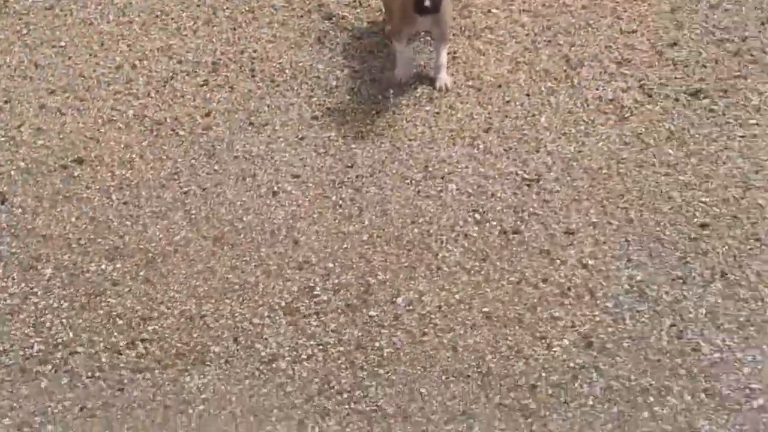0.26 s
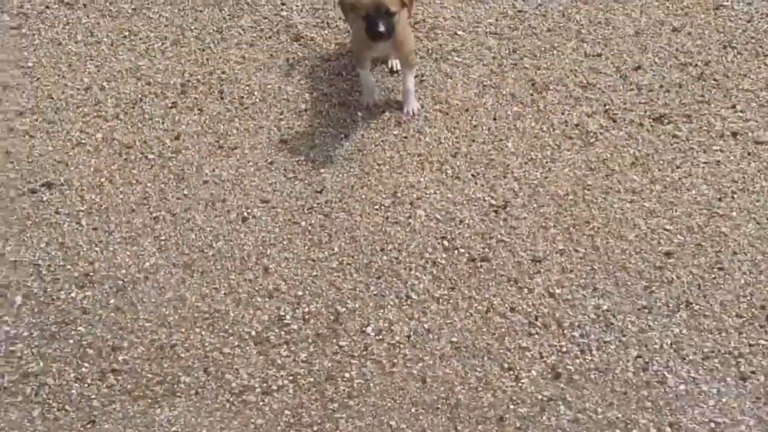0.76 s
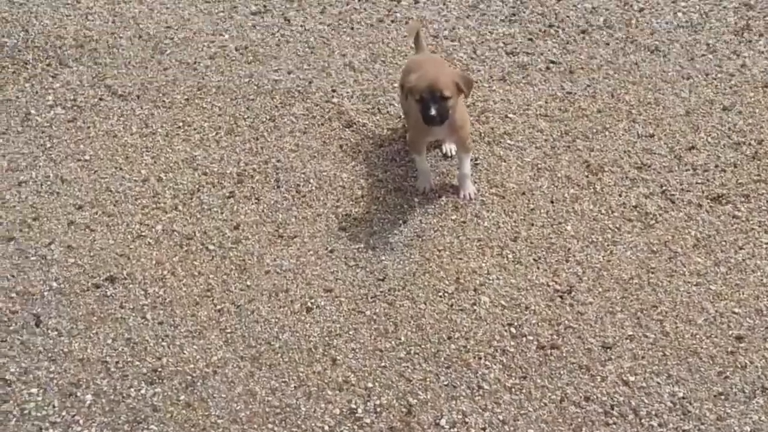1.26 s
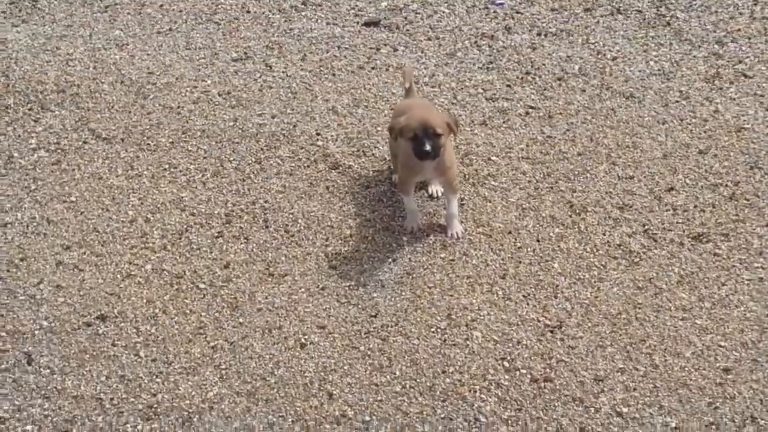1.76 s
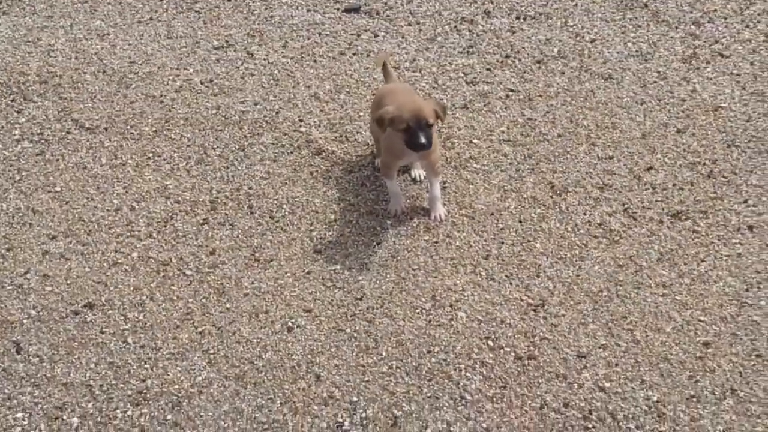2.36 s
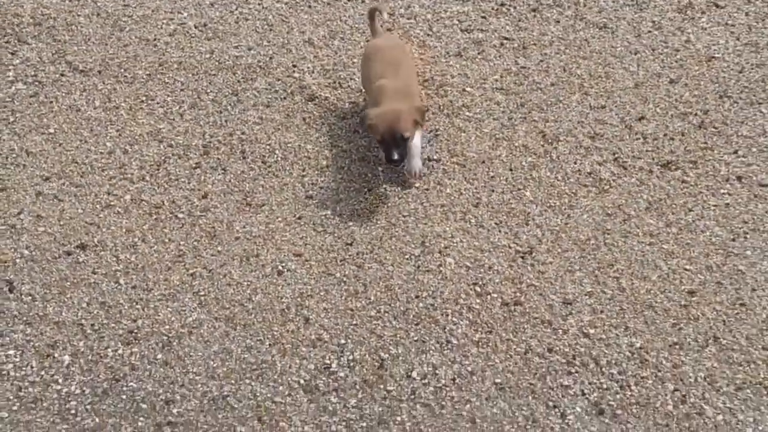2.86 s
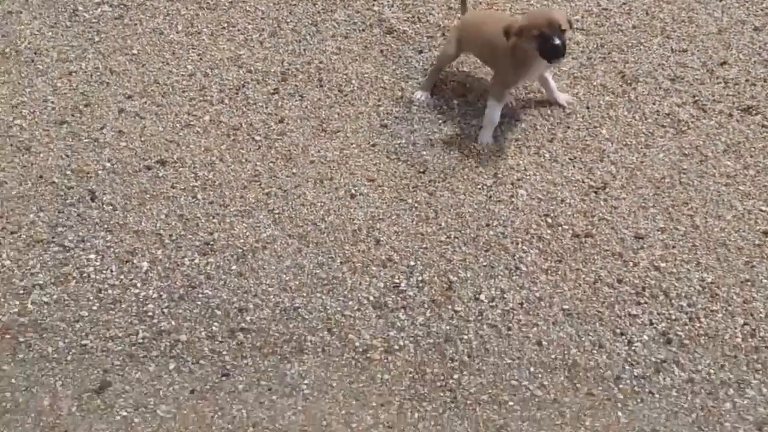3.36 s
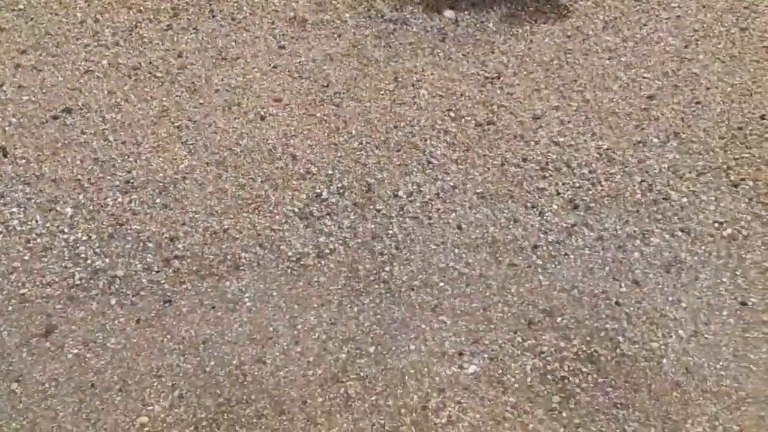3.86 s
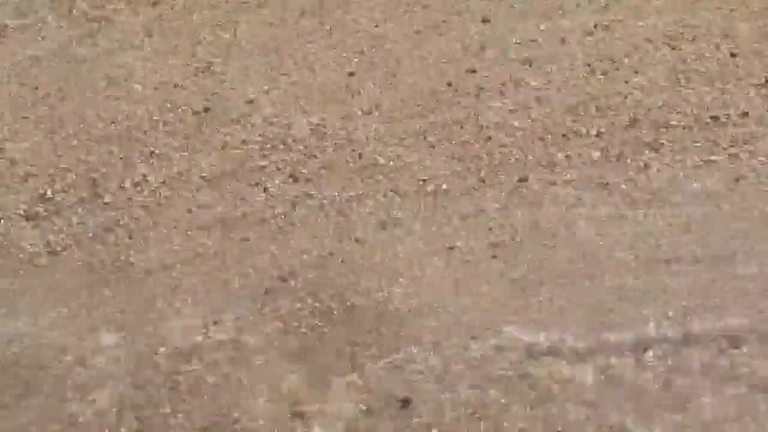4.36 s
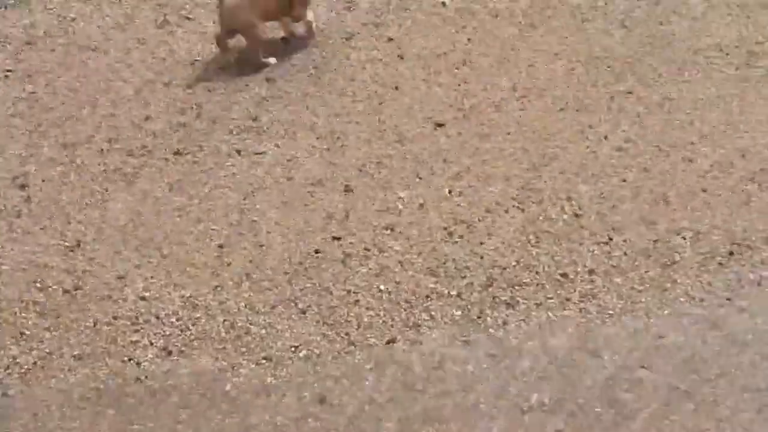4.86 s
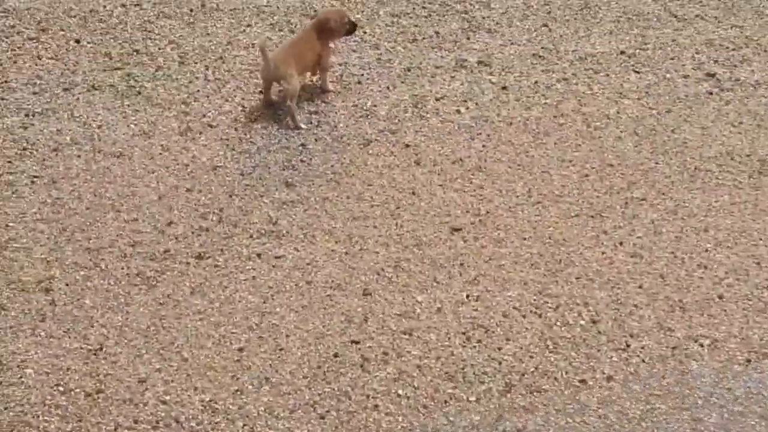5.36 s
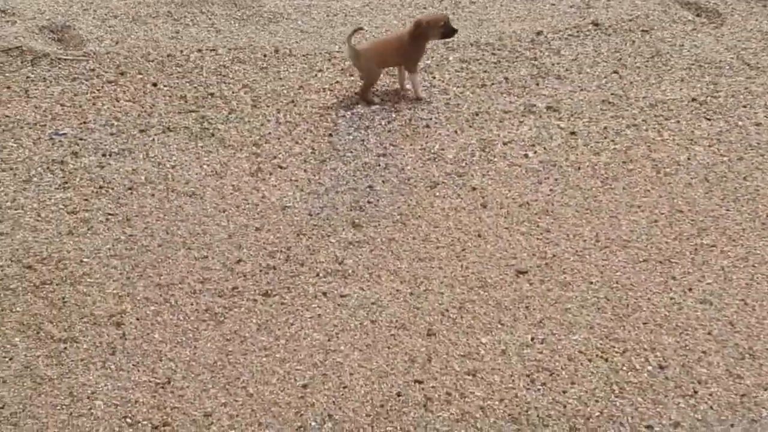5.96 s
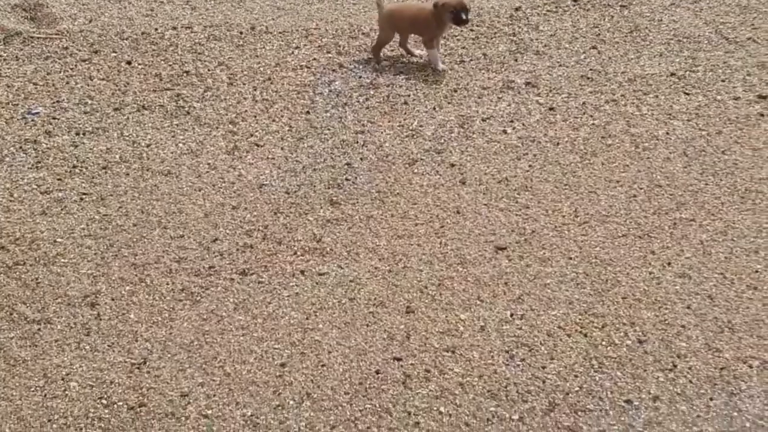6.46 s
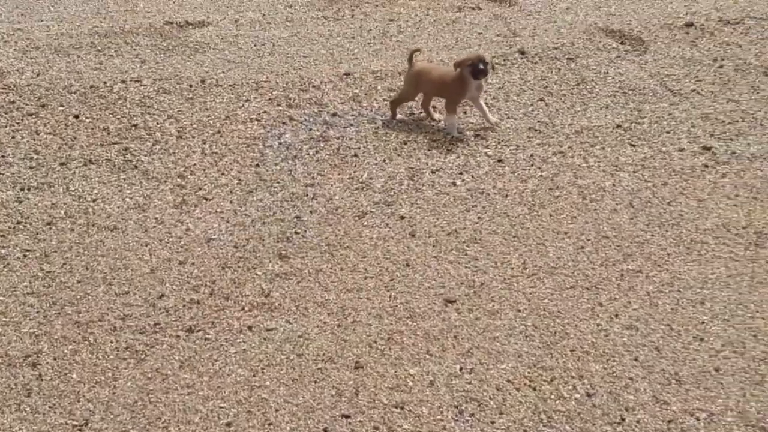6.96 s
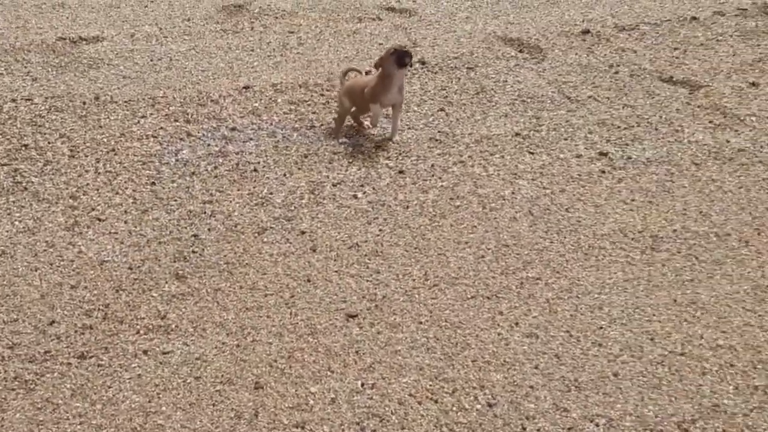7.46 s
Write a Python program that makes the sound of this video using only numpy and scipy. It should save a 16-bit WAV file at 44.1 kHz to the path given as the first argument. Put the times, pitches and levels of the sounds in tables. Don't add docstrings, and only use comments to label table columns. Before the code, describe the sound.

A small puppy yips, yelps and whines in sharp high bursts on a pebble beach, over low rumbling surf, fizzing foam and clicking stones.

```python
import sys
import numpy as np
from scipy import signal
from scipy.fft import rfft, irfft, next_fast_len
from scipy.io import wavfile
from scipy.ndimage import uniform_filter1d, minimum_filter1d

SR = 44100
rng = np.random.default_rng(int(sys.argv[2]) if len(sys.argv) > 2 else 0)


def store_pcm(level_fs):
    pcm = np.round(np.clip(level_fs, -1, 1) * 32767).astype(np.int16)
    wavfile.write(sys.argv[1], SR, np.atleast_2d(pcm).T)


def level_to_linear(level):
    exponent = np.asarray(level, float) / 20
    return 10 ** exponent


N = 340893


# (start [s], end [s], chaos share [0-1], cycles per repeating pattern, fractional lines [dB])
BREAKS = [ (-.01, .048, .99, 1, 0), (2.6, 2.66, .015, 1, 0), (2.82, 2.885, .2, 5, -9),
          (3.135, 3.227, .95, 1, 0), (3.23, 3.258, .2, 2, -13), (3.382, 3.478, .88, 1, 0),
          (3.73, 3.79, .9, 1, 0), (3.79, 3.824, .08, 2, -11), (4.212, 4.287, .92, 1, 0),
          (4.32, 4.35, .15, 1, 0), (4.678, 4.724, .88, 1, 0), (4.724, 4.762, .06, 2, -11),
          (5.062, 5.1, .85, 1, 0), (5.1, 5.14, .05, 2, -6), (5.46, 5.485, .3, 1, 0),
          (5.81, 5.83, .15, 1, 0), (6.195, 6.237, .9, 1, 0), (6.235, 6.265, .05, 2, -9),
          (6.603, 6.699, .93, 1, 0), (7.064, 7.187, .7, 3, -2), (7.343, 7.41, .04, 2, 3),
          (7.595, 7.625, .3, 2, -4), (7.625, 7.678, .92, 1, 0)]
CHAOS_LOW_DB = [13.5, 0, -12, 8, -1, 6, -6, -1, 3, -3, -7, 0, 0, 4, 10, 0, 5, 7, -4, -0.5, 2, 2, 5]
LOW_LINE_DB_PER_HZ = -0.04


def puppy():
    t = np.arange(N) / SR
    hz, levels_db = calls()
    mouth = mouth_motion(t, levels_db[1])
    jitter = 0.00528 * evened(uniform_filter1d(rng.standard_normal(N), 200))
    turns = np.cumsum(hz * (1 + jitter)) / SR
    bands = partials(turns, hz, mouth, order=1, fraction_db=0)
    for (start, end, share, cycles, fraction_db), low_db in zip(BREAKS, CHAOS_LOW_DB):
        part = slice(max(round((start - .01) * SR), 0), round((end + .01) * SR))
        fade = np.clip(np.minimum((t[part] - start) / .012, (end - t[part]) / .01) + .5, 0, 1)
        lines = partials(turns[part], hz[part], mouth[:, part], cycles, fraction_db)
        rough = np.array(chaos(hz[part], mouth[:, part].mean(1), low_db))
        line_loss_db = share * LOW_LINE_DB_PER_HZ * np.maximum(1350 - hz[part], 0)
        kept = (1 - share) * level_to_linear(np.outer([2, 0], line_loss_db))
        broken = (np.sqrt(kept) * lines + np.sqrt(share) * rough) / np.sqrt(kept + share)
        bands[:, part] = np.sqrt(1 - fade) * bands[:, part] + np.sqrt(fade) * broken
    voice = (bands * uniform_filter1d(level_to_linear(levels_db), size=150)).sum(0)
    return at_ports(t, voice) + teeth(levels_db[1] + mouth[4])


# (time [s], pitch [Hz], effort [dB], first partial over the rest [dB])
YIPS = [
    [(0.555, 1067, -62, 21), (0.572, 1217, -53, 1), (0.584, 1257, -64, 17), (0.596, 1330, -33.5, 12),
     (0.606, 1388, -33.5, 15.5), (0.622, 1404, -29, 10), (0.65, 1297, -53, 28), (0.7, 1158, -55, 6)],
    [(1.15, 944, -71, -4), (1.174, 1184, -27, 5.5), (1.192, 1200, -16, -6.5), (1.214, 1326, -18, -4),
     (1.234, 1378, -35.5, 14.5), (1.252, 1283, -43.5, 8), (1.268, 1150, -46, -6), (1.285, 1020, -51, 12)],
    [(1.77, 943, -69, -2), (1.776, 922, -66, 24), (1.814, 1233, -36.5, -1), (1.83, 1360, -30, 21.5),
     (1.846, 1425, -28.5, 17), (1.862, 1482, -20.5, 8), (1.884, 1326, -44, 25), (1.93, 1152, -48.5, 8)],
    [(3.7, 933, -65, 5), (3.712, 902, -41, -0.5), (3.728, 984, -25, -10.5), (3.74, 1300, -21, -2),
     (3.756, 1409, -22, 5.5), (3.8, 1315, -20.5, 3), (3.856, 1309, -28, 0.5), (3.9, 1200, -39, -1.5)],
    [(4.18, 813, -70, -24), (4.202, 1046, -33.5, -4.5), (4.228, 1216, -22.5, -4), (4.252, 1230, -22, -9),
     (4.274, 1415, -23.5, -11), (4.308, 1470, -37, -1.5), (4.346, 1246, -38, 6), (4.38, 1142, -56, -13)],
]
# (time [s], pitch [Hz], effort [dB], first partial over the rest [dB])
LATE_YIPS = [
    [(5.02, 946, -74, 0), (5.032, 933, -45.5, 4), (5.06, 1145, -29.5, -1.5), (5.104, 1227, -30.5, 0),
     (5.114, 1335, -30, 3.5), (5.156, 1305, -43, 10), (5.186, 1160, -38.5, -1), (5.24, 996.5, -67, 21)],
    [(5.385, 937, -70, 10), (5.403, 897.7, -45.5, 7), (5.439, 1227, -29.5, 5), (5.475, 1267, -24, -2),
     (5.497, 1355, -23.5, 10), (5.527, 1253, -31, -1), (5.571, 1065, -62, 10), (5.6, 979, -70, 9)],
    [(5.765, 1008, -56.5, 5), (5.783, 953.6, -40, 12), (5.797, 1054, -29, -3), (5.813, 1161, -26, -7.5),
     (5.839, 1303, -23, 2.5), (5.855, 1312, -31.5, 16), (5.9, 1215, -45.5, -13)],
    [(6.155, 852.4, -76, 1), (6.171, 821, -39.5, 9.5), (6.215, 1098, -22.5, -4.5), (6.223, 1267, -20, -2.5),
     (6.243, 1225, -21.5, -2.5), (6.267, 1342, -23, 0.5), (6.285, 1321, -19, 2), (6.316, 1217, -30, 1.5),
     (6.347, 1160, -56, -1)],
    [(6.57, 865, -58, 17), (6.578, 852.4, -44, 4.5), (6.618, 1090, -20.5, 0), (6.634, 1320, -16.5, -1),
     (6.672, 1295, -20.5, 7.5), (6.678, 1246, -18, -8), (6.7, 1312, -22.5, 1), (6.724, 1316, -22.5, 1.5),
     (6.79, 1138, -53.5, -1)],
]
# (time [s], pitch [Hz], effort [dB], first partial over the rest [dB])
YELPS = [
    [(0.0, 1650, -9, 5), (0.028, 1618, -20.5, 4), (0.036, 1487, -21, 8), (0.056, 1341, -11.5, 13),
     (0.076, 1443, -25.5, 20), (0.086, 1294, -24.5, 8), (0.108, 1296, -58, 22), (0.14, 1058, -43, -7)],
    [(2.76, 1364, -45, 3), (2.784, 1354, -27.5, 7), (2.816, 1480, -12, 7.5), (2.822, 1434, -17.5, 0),
     (2.881, 1528, -17, 0), (2.89, 1586, -12, 3), (2.936, 1557, -23.5, 10), (2.962, 1417, -36, 2),
     (2.975, 1552, -66.5, -6)],
    [(3.13, 1409, -42.5, 0), (3.14, 1408, -37, -9), (3.152, 1636, -17, -1.5), (3.176, 1614, -23, 4.5),
     (3.186, 1509, -18.5, -3), (3.2, 1465, -14.5, 15), (3.244, 1316, -22, 4), (3.294, 1327, -23, 1),
     (3.34, 1176, -43.5, 8)],
    [(3.34, 1176, -42, -8), (3.366, 1258, -27.5, -6), (3.378, 1253, -23.5, 5), (3.392, 1425, -21, -3.5),
     (3.402, 1406, -20, 10), (3.44, 1482, -19, 9.5), (3.45, 1330, -21.5, 5.5), (3.502, 1431, -19.5, 11),
     (3.555, 1275, -47.5, 4)],
]
# (time [s], pitch [Hz], effort [dB], first partial over the rest [dB])
MORE_YELPS = [
    [(2.56, 984, -80, 27), (2.594, 1208, -32.5, 0), (2.612, 1382, -16, 16), (2.616, 1249, -9.5, -5.5),
     (2.64, 1427, -17, 0.5), (2.657, 1584, -26.5, 17), (2.665, 1493, -47, 22.5), (2.71, 1430, -44, 23),
     (2.76, 1312, -50, 16)],
    [(4.645, 955, -49, -3), (4.673, 1094, -28.5, -5.5), (4.701, 1298, -21.5, -4.5), (4.727, 1371, -22, 1),
     (4.751, 1365, -24.5, -3), (4.771, 1362, -28.5, -4), (4.82, 1230, -46.5, 1), (4.87, 1063, -61, 9)],
    [(7.05, 800, -54, 9), (7.067, 934.6, -33, 3.5), (7.08, 1089, -19, -2), (7.145, 1173, -17.5, 4.5),
     (7.175, 1172, -23.5, -1.5), (7.197, 1144, -30, -1.5), (7.239, 1115, -51, 2), (7.28, 1024, -58, -1)],
    [(7.57, 896, -54, 8), (7.597, 1100, -31, 0), (7.622, 1196, -28, 1), (7.646, 1370, -23.5, 8),
     (7.658, 1301, -18, 5), (7.678, 1135, -21, -9), (7.7, 1179, -27.5, -5.5), (7.73, 1140, -36.5, 1)],
]
# (start [s], length [s], first pitch [Hz], last pitch [Hz], level [dB])
WHINES = [(0.145, 0.16, 984, 1085, -51), (0.7, 0.25, 1156, 1087, -47.5), (1.289, 0.29, 984, 1057, -44.5),
          (1.915, 0.11, 1212, 939.7, -41.5), (2.242, 0.027, 928, 964, -42),
          (3.898, 0.12, 1233, 1171, -54.5), (4.38, 0.12, 1163, 1123, -55), (5.9, 0.097, 1221, 917, -46),
          (6.345, 0.085, 1157, 990, -51), (6.783, 0.13, 1130, 1007, -54), (7.283, .13, 960, 920.6, -43.5)]
WHINE_UPPER_DB = [-4, -9.5, -6, -9, -7.5, 1, 3, -5.5, -2, 10.5, 0]
# (bow of the pitch [Hz], accent on the ending [dB])
WHINE_SHAPE = [(-3, -5), (-21.5, -3), (-35.5, 5), (5.5, -1), (3, 5), (-13.5, 9), (-24.5, 6), (12.5, -15),
               (5.5, -1), (-22, -15), (4.5, -3)]


def calls():
    track = np.array([[900], [-120], [-120]]) * np.ones(N)
    every = [whine(*row, db, *shape) for row, db, shape in zip(WHINES, WHINE_UPPER_DB, WHINE_SHAPE)]
    every += [yelp(rows) for rows in YIPS + LATE_YIPS + YELPS + MORE_YELPS]
    for t, *call in every:
        part = track[:, round(t[0] * SR):][:, :len(t)]
        call = np.array(call)[:, :part.shape[1]]
        part[:] = np.where(call[1] > part[1], call, part)
    unpitched = track[1] < -100
    for start, end, share, *_ in BREAKS[1:]:
        unpitched[round(start * SR):round(end * SR)] |= share >= .8
    track[0] = np.interp(np.arange(N), np.flatnonzero(~unpitched), track[0, ~unpitched])
    return uniform_filter1d(track[0], size=110), track[1:]


def yelp(rows):
    s, *curves = np.transpose(rows)
    t = np.arange(max(s[0], 0), s[-1], 1 / SR)
    hz, effort_db, purity_db = (np.interp(t, s, curve) for curve in curves)
    return t, hz, effort_db + purity_db, effort_db


WHINE_SWELL_DB, WHINE_EDGE_S, WHINE_DROP = 4.5, 0.047, 0.17


def whine(start, length, first_hz, last_hz, level_db, upper_db, bow_hz, accent_db):
    t = np.arange(0, length, 1 / SR)
    ending = np.clip(1 - (length - t) / min(WHINE_EDGE_S, length / 4), 0, 1)
    hz = first_hz + (last_hz - first_hz) * t / length + bow_hz * np.sin(np.pi * t / length)
    hz = hz * (1 - WHINE_DROP * ending ** 2)
    db = level_db + WHINE_SWELL_DB * (2 * t / length - 1) - 12 * ending ** 4
    return start + t, hz, db, db + upper_db + accent_db * (t / length) ** 4 + 4 * ending


# (time [s], stretch of the resonances [ratio], second resonance [dB], top [dB])
MOUTH = [(0, 0.984, 4, 12.5), (.22, 0.75, -2, -21), (0.601, 0.68, -32, 1), (0.799, 1.6, -13, -1),
         (1.202, 0.906, 1, 0), (1.33, 0.48, -6, -4), (1.6, 0.19, 6.5, -0.5), (1.85, 1.3, -13, -1),
         (2.263, 0.36, 7, 8), (2.629, 1.092, -8.5, -6), (2.881, 1.138, -1.5, -0.5), (3.201, 0.917, -3, 2.5),
         (3.449, 1.023, -6.5, -3.5), (3.781, 1.096, -5, 1), (3.949, 0.68, -11, -3), (4.02, 0.32, 14.5, 0),
         (4.251, 0.973, 2.5, 2.5), (4.721, 0.94, -2, 3), (5.1, 0.927, 1, 7.5), (5.48, 0.976, -6.5, 3),
         (5.839, 0.956, 3.5, 1), (5.95, .95, -10, 2), (6.249, 0.975, -1.5, 4.5), (6.385, .95, -9, 2),
         (6.659, 1.016, 1, 6), (6.86, 0.56, -7, 0), (7.121, 1.017, 6.5, 4), (7.37, 0.67, 19, 10),
         (7.65, 0.958, 4, 5.5)]
FOURTH_DB = [7, -9, 6, -3, 6.5, -13, 3, 4.5, 3.5, 3.5, 4, 1.5, -3, -4.5, -10, 8, 3.5, 3.5, -3.5, -6, 0.5,
             12, 0, 10.5, -0.5, 7.5, -8.5, 14, -7]
AIR_DB = [6.5, -2.5, 3, 0, 3.5, 4, -5, 16, -4, 7.5, 6.5, 0.5, 1.5, -1.5, -0.5, -7, 6, 2, -8.5, -11, -4, -2,
          -1, 0.5, 4.5, 0, 5.5, -4, 5.5]
ONSET_DULL_DB = -3.5


def mouth_motion(t, effort_db):
    at, *jaw = np.transpose(MOUTH)
    shut = np.clip((-36 - uniform_filter1d(effort_db, size=400)) / 9, 0, 1)
    mouth = np.array([*(np.interp(t, at, column) for column in [*jaw, FOURTH_DB, AIR_DB]), shut])
    rise_db_per_s = np.gradient(uniform_filter1d(effort_db, size=600)) * SR
    mouth[2:4] += ONSET_DULL_DB * np.clip(rise_db_per_s / 500, 0, 1)
    return mouth


def partials(turns, hz, mouth, order, fraction_db):
    sound, power = np.zeros((2, 2, len(hz))) + 1e-12
    for m in range(order, 12 * order):
        k = m / order
        gain = level_to_linear(tract_db(k * hz, mouth) + (fraction_db if m % order else 0))
        gain *= 1 + .35 * np.sin(turns / 16 + 3 * k * k)
        band = int(k > 1.15)
        sound[band] += gain * np.cos(2 * np.pi * k * turns + k * k)
        power[band] += gain ** 2 / 2
    return sound / np.sqrt(power)


def chaos(hz, mouth, low_db):
    drift, bursts, strength = rng.standard_normal((len(hz), 3)).T
    wander, bursts = (evened(uniform_filter1d(v, size=110)) for v in (drift, bursts))
    rate_hz = np.clip(hz, 1300, 1430) * np.clip(1 + .08 * wander, .2, 2)
    cycle = np.floor(np.cumsum(rate_hz) / SR)
    slaps = np.diff(cycle, prepend=0) * (.7 + .1 * bursts + .4 * strength)
    pockets_db = 5 * rng.standard_normal(40)

    def ring(f):
        peaks_db = np.interp(f, np.linspace(0, 16000, 40), pockets_db)
        delays = np.exp(1j * (f / 600) ** 2)
        return level_to_linear(tract_db(f, mouth) + peaks_db) * delays

    def low(f):
        return level_to_linear(low_db * np.clip((1450 - f) / 200, 0, 1)) / (1 + (880 / (f + 1)) ** 10)

    rung = [colour(slaps, lambda f: ring(f) * low(f) * ((f > 1740) == upper)) for upper in (0, 1)]
    return [v / np.sqrt(uniform_filter1d(v ** 2, size=n, mode="wrap")) for v, n in zip(rung, (900, 300))]


# (frequency [Hz], level [dB])
THROAT = [(600, -28.5), (1050, -27), (1400, -6.5), (1850, -4.5), (2300, -9.5), (2850, -28), (3400, -12.5),
          (4000, -9), (4550, -18.5), (5050, -13.5), (5750, -29), (6450, -17), (7900, -42.5), (10000, -67.5),
          (13500, -56)]
# (frequency [Hz], level [dB])
NOSE = [(1500, -11), (2050, -2.5), (2400, -24.5), (2900, -28.5), (3600, -21), (4200, -33.5), (4900, -22),
        (6000, -31), (8000, -42), (15000, -71)]
POCKET_HZ, POCKET_WIDTH_HZ, POCKET_DB = 2790, 187, -10
SHUT_TILT_DB = 5


def tract_db(hz, mouth):
    stretch, second_db, top_db, fourth_db, air_db, shut = mouth
    reach = above(hz, 1800) * np.clip((7900 - hz) / 2000, 0, 1)
    shape = (1 - shut) * read(THROAT, hz / stretch ** reach) + shut * read(NOSE, hz)
    shape = shape + POCKET_DB * np.exp(-((hz - POCKET_HZ) / POCKET_WIDTH_HZ) ** 2)
    shape = shape + SHUT_TILT_DB * shut * np.log2(np.maximum(hz / 3000, 1))
    second, fourth, top, air = (above(hz, edge) for edge in (2900, 4400, 5700, 9000))
    shape = shape + second_db * (1 - second) + fourth_db * (fourth - top)
    return shape + top_db * (top - air) + air_db * air


AIR_HISS_DB, AIR_HISS_HZ, AIR_HISS_WIDTH_HZ = -39.5, 13400, 1400


def teeth(level_db):
    noise = rng.standard_normal((2, N))
    hiss = evened(colour(noise, lambda f: np.exp(-((f - AIR_HISS_HZ) / AIR_HISS_WIDTH_HZ) ** 4)))
    sputter = evened(uniform_filter1d(rng.standard_normal(N), size=600))
    balance = level_to_linear(np.array([[3], [-3]]))
    return hiss * level_to_linear(4 * sputter) * balance * uniform_filter1d(level_to_linear(level_db + AIR_HISS_DB), size=300)


# (frequency [Hz], left minus right [dB])
DOG_SIDE = [(800, -2.2), (2800, -3), (4500, -5), (7400, -5), (9000, 4), (13500, 7)]
# (frequency [Hz], lead of the left port [rad])
DOG_PHASE = [(500, .4), (2400, .45), (3360, -1.5), (4220, -1.2), (4740, .8), (7580, 1.6)]
GROUND_DB, GROUND_T60_S = -17, .05


def at_ports(t, voice):
    tail = rng.standard_normal((2, 4000)) * level_to_linear(-60 * t[:4000] / GROUND_T60_S)
    scatter = signal.oaconvolve(voice[None], tail / np.linalg.norm(tail[0]), axes=1)[:, :N]

    def port(side):
        return lambda f: level_to_linear(side * read(DOG_SIDE, f) / 2) * np.exp(.5j * side * read(DOG_PHASE, f))

    return np.array([colour(voice + level_to_linear(GROUND_DB) * echo, port(side)) for side, echo in zip((1, -1), scatter)])


# (time [s], peak [dB], ring [Hz])
PEBBLES = [(0.3897, -53, 3780), (0.998, -40, 5625), (3.56, -41, 3476), (3.597, -60, 3560),
           (3.6492, -44, 5830), (4.089, -57, 4477), (4.5786, -43, 3954), (5.207, -41, 3180),
           (5.7071, -58, 4995), (5.9966, -51, 3091), (7.3966, -53, 4180)]
# (time [s], peak [dB], ring [Hz])
MORE_KNOCKS = [
    (1.09, -42, 1307),
    (4.117, -51, 2950),
    (6.456, -27.5, 1180),
]


def pebbles():
    out, t = np.zeros(N), np.arange(800) / SR
    knocks = PEBBLES + MORE_KNOCKS
    for (s, db, hz), noise in zip(knocks, rng.standard_normal((len(knocks), 800))):
        def ring(f):
            skirt = .12 * (f > .6 * hz) / (1 + (f / (2 * hz)) ** 4)
            return skirt + np.exp(-((f - hz) / (0.22 * hz)) ** 2)

        at = round(s * SR)
        decay = level_to_linear(db - 5 - 60 * t / 0.028)
        out[at:at + 800] += decay * np.minimum(t / 0.00045, 1) * evened(colour(noise, ring))
    return out * level_to_linear(np.array([[2.5], [-2.5]]))


# (time [s], level [dB])
GUST = [
    (0.11, -72),
    (0.136, -27),
    (0.182, -25),
    (0.266, -45),
    (0.3, -66),
]


def gust():
    s, db = np.transpose(GUST)
    t = np.arange(SR // 2) / SR
    shared, own = rng.standard_normal(len(t)), rng.standard_normal((2, len(t)))
    puff = evened(colour(shared + 1.3 * own, lambda f: f / (f + 80) / (1 + (f / 330) ** 4)))
    return np.pad(puff * level_to_linear(np.interp(t, s, db, left=-120, right=-120)), [(0, 0), (0, N - len(t))])


# (frequency [Hz], level [dB])
WIND = [(30, -38), (60, 7), (105, 23), (150, -0.5), (250, -45.5)]
RUMBLE = [(82, -12), (140, -4), (349, 1.5), (538, -12.5), (942, -13.5), (1100, -20), (1430, -60.5),
          (2420, -120)]
WASH = [(500, 0.5), (900, -0.5), (1300, 1.5), (1900, -2), (2500, -6), (4000, -10.5), (5800, -11.5),
        (7800, -16), (10000, -28.5)]
FIZZ = [(5000, -22.5), (8000, -20.5), (10000, -16), (12000, -4.5), (13800, -2), (15800, -7)]
# (time [s], level [dB])
BREEZE = [(0, -33.5), (.21, -32.5), (.36, -56.5), (.9, -41), (1.29, -48.5), (2, -44.5), (2.93, -45.5),
          (3.36, -44.5), (4.3, -45), (4.64, -35.5), (4.86, -52.5), (5.49, -38), (5.9, -43.5), (6.3, -32.5),
          (6.69, -40.5), (7.73, -38.5)]
# (time [s], wave [dB], foam [dB])
SWELL = [(0, -35.5, -60), (0.209, -46.5, -56), (0.497, -44, -62), (1.292, -45.5, -65), (1.55, -40, -64),
         (2.63, -38.5, -62), (2.797, -41.5, -61), (3.183, -43, -61.5), (3.4, -44.5, -64),
         (4.669, -39.5, -63.5), (4.861, -39, -64.5), (5.491, -34.5, -63), (5.9, -34, -63.5),
         (6.481, -31.5, -59.5), (6.691, -34.5, -60.5), (7.73, -34, -65)]
# (start [s], length [s], lift [dB])
SHEETS = [
    (4.1, 0.068, 4.5),
    (4.848, .06, 4),
    (5.1, 0.074, 8),
    (5.207, .075, 10.5),
    (5.313, .06, 8),
    (5.398, .11, 7.5),
    (5.598, 0.088, 6.5),
    (5.98, 0.056, 2.5),
]
# (frequency [Hz], likeness [0-1])
SURF_SAME = [(30, 0), (60, .2), (150, .7), (400, .7), (800, .5), (3000, .5), (15000, .3)]
# (frequency [Hz], left minus right [dB])
SURF_SIDE = [(60, -3.5), (300, -3), (700, 0), (3000, -1.5), (7400, -1), (9500, 5), (13500, 6.5)]
SURF_LEAD_S = 0.00049
WASH_DB, WASH_PER_WAVE, WASH_PER_FOAM = -48, 0.035, 1


def surf():
    frames, hz = N // 256 + 5, np.fft.rfftfreq(1024, 1 / SR)
    t = np.arange(frames) * 256 / SR
    s, *swell_db = np.transpose(SWELL)
    wave_db, foam_db = (np.interp(t, s, db) for db in swell_db)
    wash_db = WASH_DB + WASH_PER_WAVE * (wave_db - wave_db.mean()) + WASH_PER_FOAM * (foam_db - foam_db.mean())
    for start, length, lift_db in SHEETS:
        foam_db = foam_db + lift_db * np.clip(np.minimum(t - start, start + length - t) / .01 + .5, 0, 1)
    levels_db = np.interp(t, *np.transpose(BREEZE)), wave_db, wash_db, foam_db
    a, b, c, d, patches = rng.standard_normal((frames, 513, 5)).T
    patches = evened(uniform_filter1d(uniform_filter1d(patches, 10, 0), 12, 1))
    flicker = evened(uniform_filter1d(rng.standard_normal(frames), 5))
    power = 0
    for shape, db, flicker_db in zip((WIND, RUMBLE, WASH, FIZZ), levels_db, (2.3, 0.11, 1.7, 1.2)):
        spectrum = evened(level_to_linear(read(shape, hz)))[:, None]
        power = power + (spectrum * level_to_linear(db + flicker_db * flicker)) ** 2
    same = np.clip(read(SURF_SAME, hz), 0, 1)[:, None]
    left, other = a + 1j * b, c + 1j * d
    lead_s = SURF_LEAD_S / (1 + (600 / (hz + 1)) ** 4)
    late = np.exp(-2j * np.pi * hz * lead_s)[:, None]
    z = np.array([left, late * (same * left + np.sqrt(1 - same ** 2) * other)])
    side = level_to_linear(read(SURF_SIDE, hz) / 2)[:, None]
    z *= np.sqrt(power) * level_to_linear(1.25 * patches - 23.5) * np.array([side, 1 / side])
    return signal.istft(z, nperseg=1024, noverlap=768)[1][:, :N]


def evened(x):
    return x / np.sqrt(np.mean(x ** 2) + 1e-20)


def read(points, hz):
    f, value = np.transpose(points)
    return np.interp(np.log(hz + 1), np.log(f + 1), value)


def colour(x, gain):
    size = next_fast_len(x.shape[-1])
    return irfft(rfft(x, size) * gain(np.fft.rfftfreq(size, 1 / SR)), size)[..., :x.shape[-1]]


def above(hz, edge_hz):
    return np.clip((hz - edge_hz) / 300 + .5, 0, 1)


def scene():
    return puppy() + pebbles() + gust() + surf()


def band_limit(x):
    return signal.sosfilt(signal.butter(12, 15780, fs=SR, output="sos"), x)


def record(dry):
    thinned = colour(dry, lambda f: f ** 3 / (f ** 3 + 67.0 ** 3))
    peak = uniform_filter1d(-minimum_filter1d(-abs(thinned).max(0), size=200), size=100)
    held = thinned / np.maximum(peak / .88, 1)
    return band_limit(held)


dry = scene()
out = record(dry)
store_pcm(out)
```